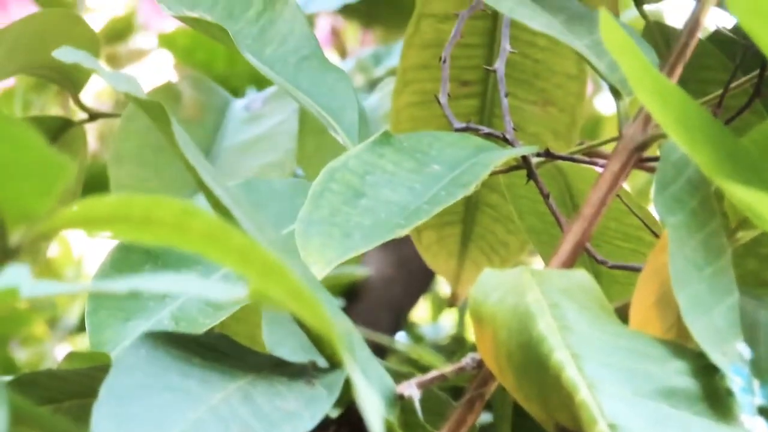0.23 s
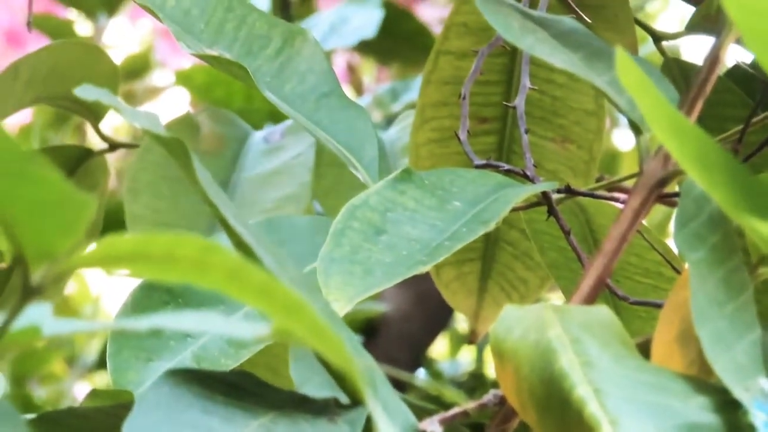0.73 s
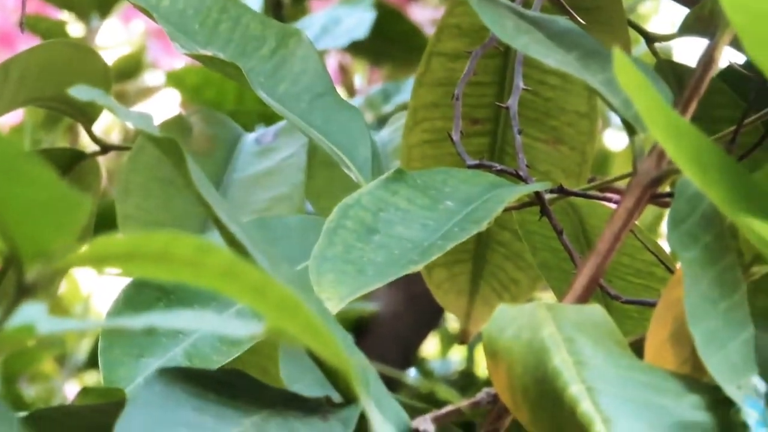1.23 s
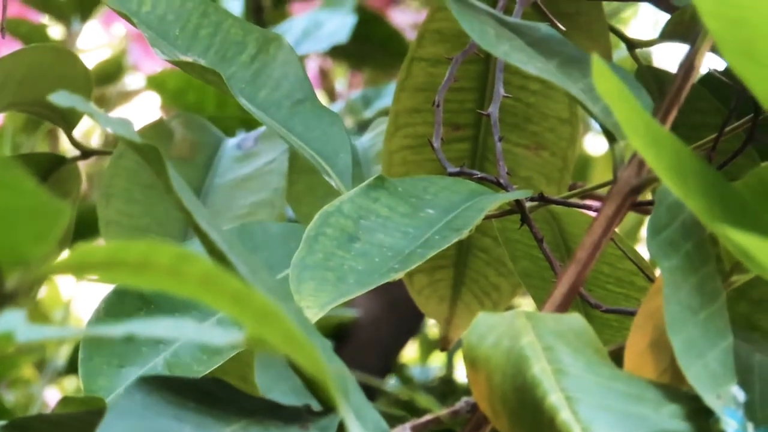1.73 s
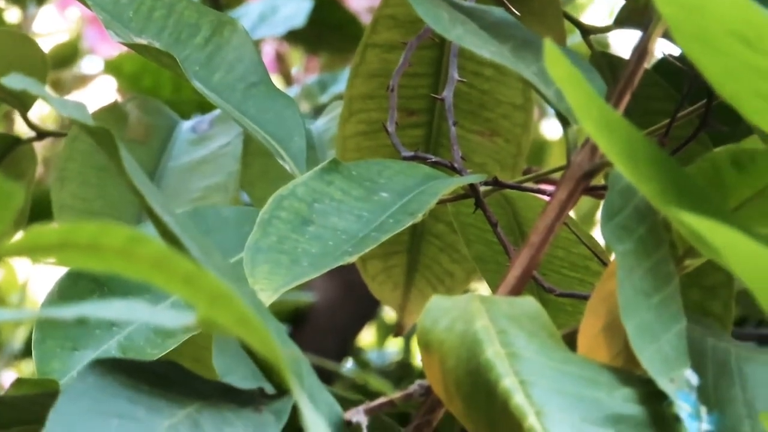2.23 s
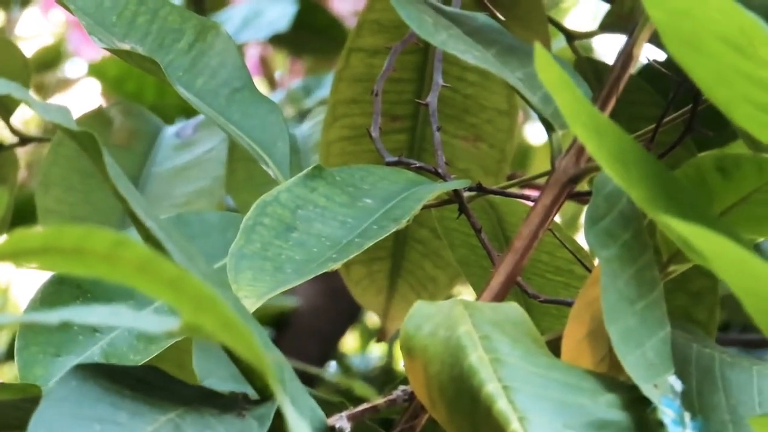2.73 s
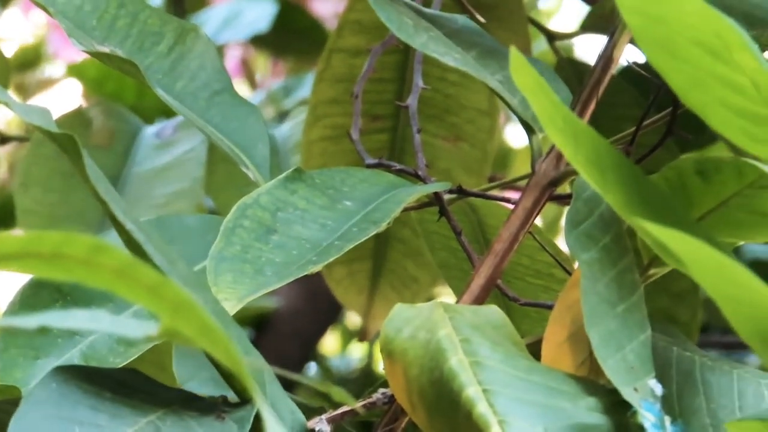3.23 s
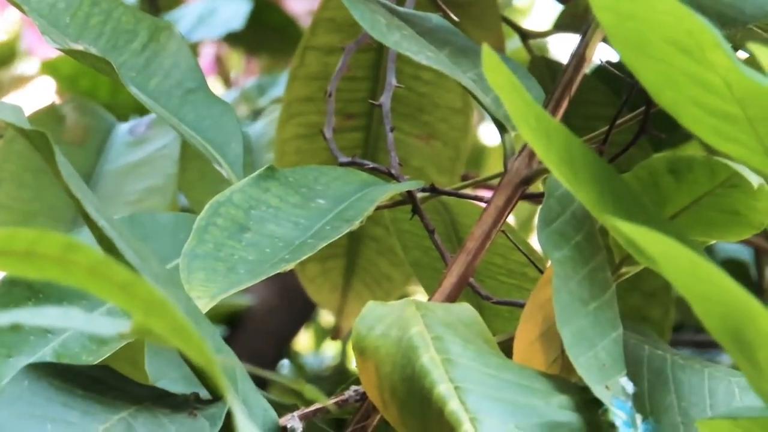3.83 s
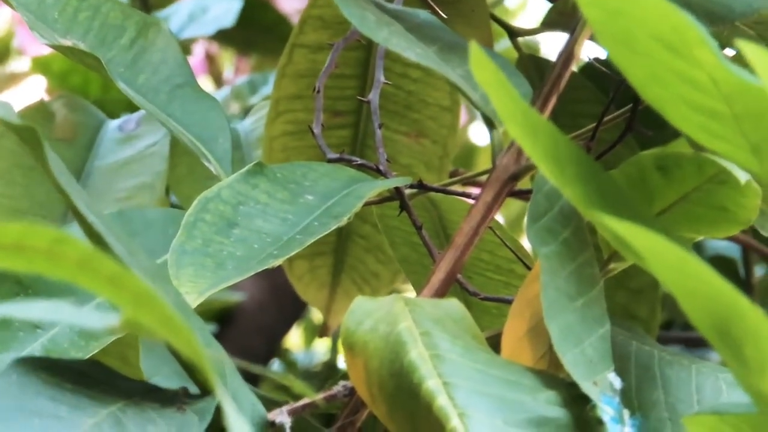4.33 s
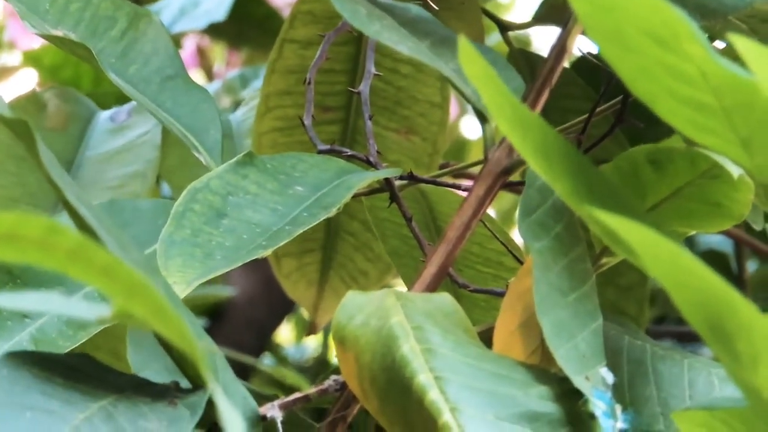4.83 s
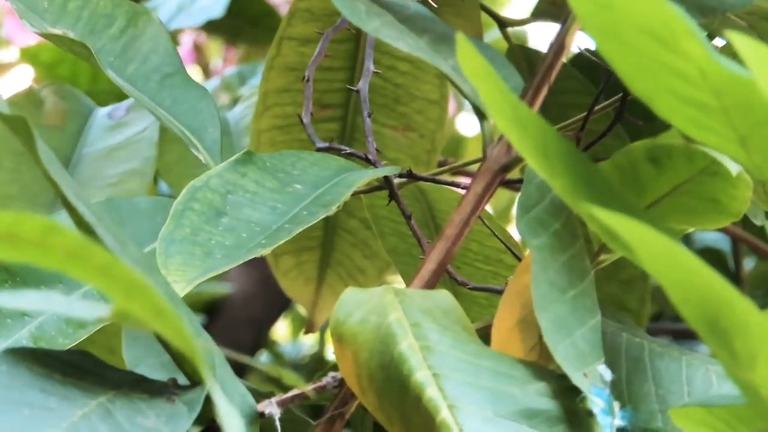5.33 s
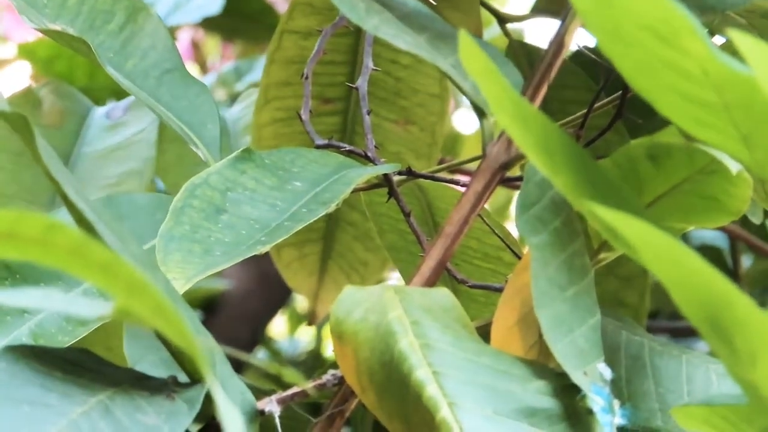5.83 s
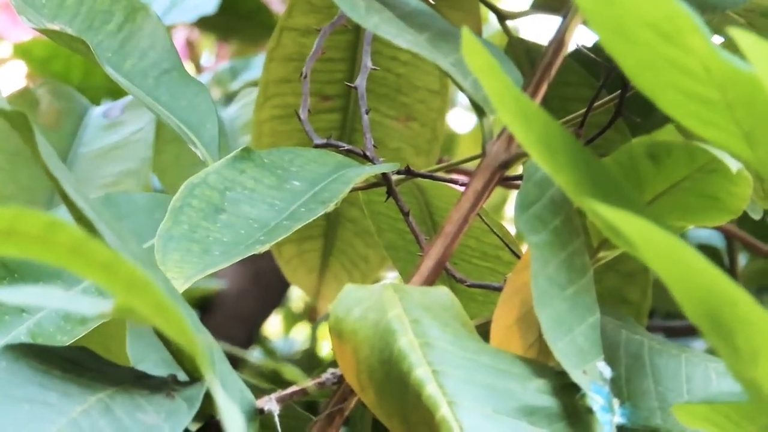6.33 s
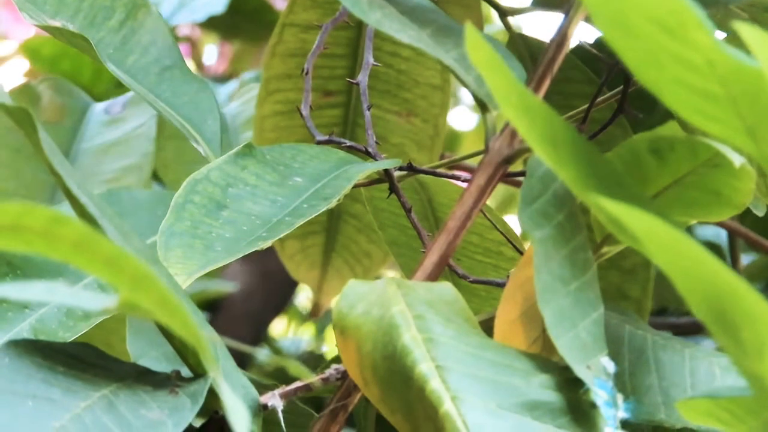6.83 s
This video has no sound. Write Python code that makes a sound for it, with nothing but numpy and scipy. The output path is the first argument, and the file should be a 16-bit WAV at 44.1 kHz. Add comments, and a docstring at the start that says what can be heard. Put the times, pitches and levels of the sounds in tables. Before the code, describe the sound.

A small bird sings a fast run of sharp chirps and buzzy rising trills in a shrub, over a faint town haze.

```python
"""In a garden shrub, tailorbirds peep and scold, then sing buzzy rising trills, a fast run of
two-part chirps and trills again. Each note is a gliding tone from the syrinx, a bird's voice box.
Leaves scatter every note, and walls and trees add a long faint tail. Behind them lie a town's haze,
a low motor drone, a thin insect hiss and far-off caws and hoots. Close by, a leaf brushes and
a hand bumps the microphone once."""
import sys
import numpy as np
from scipy import signal
from scipy.fft import rfft, irfft
from scipy.io import wavfile
from scipy.ndimage import uniform_filter1d

SR = 44100
rng = np.random.default_rng(int(sys.argv[2]) if len(sys.argv) > 2 else 0)


def write(x):
    x = np.atleast_2d(x).T
    wavfile.write(sys.argv[1], SR, np.round(np.clip(x, -1, 1) * 32767).astype(np.int16))


N = 312228
TIME = np.arange(N) / SR


def from_db(db):
    """Turn decibels into a gain."""
    return 10 ** (np.asarray(db) / 20)


def rms_one(x):
    """Scale a signal to an average strength (rms) of 1."""
    return x / np.sqrt(np.mean(x ** 2) + 1e-20)


def columns_at(rows, t):
    """Read every column of a curve at times t."""
    s, *columns = np.transpose(rows)
    return [np.interp(t, s, c) for c in columns]


def at_hz(points, hz):
    """Read a curve at frequencies hz, with octaves evenly spaced."""
    f, value = np.transpose(points)
    return np.interp(np.log(hz + 1), np.log(f), value)


def wander(rate_hz, size):
    """A random wobble of strength 1, up to about rate_hz fast."""
    hz = np.fft.rfftfreq(N, 1 / SR)[:size // 2 + 1] * N / size
    return rms_one(irfft(rfft(rng.standard_normal(size)) / (1 + (hz / rate_hz) ** 4), size))


def phase_of(hz):
    """The running angle of a tone that follows a pitch curve."""
    return 2 * np.pi * np.cumsum(hz) / SR


def narrow_noise(hz, width_hz):
    """One band of noise around a steady or moving pitch."""
    phase = phase_of(hz * np.ones(N))
    return wander(width_hz / 2, N) * np.cos(phase) + wander(width_hz / 2, N) * np.sin(phase)


def swells(rows):
    """Rounded humps of loudness from rows of t/s, length/s, level/dB."""
    out = np.zeros(N)
    for s, length, db in rows:
        progress = np.clip((TIME - s) / length, 0, 1)
        out += from_db(db) * np.sqrt(2 * np.abs(np.sin(np.pi * progress)))
    return out


# How wide the sound is between left and right: f/Hz, side level over middle/dB
STEREO_WIDTH = [(45, -47), (100, -49), (180, -30), (350, -18), (700, -25), (1400, -18), (2600, -14),
                (4400, -7.5), (8000, -2), (15000, 2.5)]
def stereo_noise(size):
    """White noise at two close microphones: alike in the bass, unrelated in the treble."""
    width = from_db(at_hz(STEREO_WIDTH, np.fft.rfftfreq(size, 1 / SR)))
    mid, side = rfft(rng.standard_normal((2, size)))
    return irfft((mid + width * side * [[1], [-1]]) / np.sqrt(1 + width ** 2), size)


def note_curves(t, low_hz, start_hz, top_hz, scoop_s, rise_s, bend, droop_hz_per_s,
                scoop_db, attack_s, hold_s, end_db, release_s):
    """A note scoops from low_hz to start_hz, climbs to top_hz, then droops if it lasts long enough."""
    scoop = np.clip(1 + t / scoop_s, 0, 1)
    rise = np.clip(t / rise_s, 0, 1)
    climb_hz = (top_hz - start_hz) * rise * (1 + bend * (1 - rise))   # bend > 0 arches the climb
    droop_hz = droop_hz_per_s * np.clip(t - rise_s, 0, hold_s)
    hz = low_hz + (start_hz - low_hz) * scoop ** 2 + climb_hz - droop_hz
    loudness = np.interp(t, [-scoop_s, 0, attack_s, hold_s, hold_s + release_s],
                         [0, from_db(scoop_db), 1, from_db(end_db), 0])
    return np.maximum(hz, low_hz), loudness


# The throat swallows the low overtones and lets the highest through: f/Hz, level/dB
THROAT = [(7000, 0.5), (8500, -4), (10500, -2), (13000, 2), (15000, 9)]
def syrinx(notes, shape, partials, jitter, jitter_hz, flutter_db, trill_hz=0, trill_depth=0, throb_db=0):
    """The voice box sings rows of t/s, level/dB, length factor, pitch factor; jitter shakes the pitch."""
    beak_hz, beak_width_hz, beak_peak_db = 4950, 240, 3.0   # the open beak favours one pitch
    out, size = np.zeros(N + SR), 8192
    for s, level_db, length, pitch in notes:
        first = max(round((s - shape["scoop_s"] * length) * SR), 0)
        t = (first + np.arange(size)) / SR - s
        hz, loudness = note_curves(t / length, **shape)
        # a trill swings the pitch after the scoop, then settles; the bottom of each swing is loudest
        swing = -np.cos(2 * np.pi * trill_hz * (t - .004) + .5 * wander(27, size))
        swing *= np.interp(t / length, [-.01, 0, .05, .0657], [0, .99, .99, .31])
        hz = hz * pitch * (1 + trill_depth * swing + .0044 * wander(58, size))
        shake = jitter * np.sqrt(loudness) * wander(jitter_hz, size)   # soft scoops are cleaner
        phase = phase_of(hz * (1 + shake))
        effort = loudness * from_db(flutter_db * wander(112, size) - throb_db * swing)
        for k, partial_db in partials:
            beak_db = beak_peak_db / (1 + ((k * hz - beak_hz) / beak_width_hz) ** 2)
            gain = from_db(level_db + partial_db + beak_db + at_hz(THROAT, k * hz))
            gain *= effort ** (1 + .026 * (k - 1))   # overtones grow faster with effort
            out[first:first + size] += np.sqrt(2) * gain * (k * hz < SR / 2) * np.sin(k * phase)
    return out[:N]


def with_air(voice, air_db, centre_hz=14300, width_hz=3600, flicker_db=4):
    """Air rushing through the syrinx adds an uneven high sizzle that follows the note."""
    loudness = np.sqrt(np.abs(uniform_filter1d(voice ** 2, size=128)))
    flicker = from_db(flicker_db * wander(70, N))
    return voice + from_db(air_db) * loudness * flicker * narrow_noise(centre_hz, width_hz)


def foliage(x, direct_db, leaves_db, leaves_s, tail_db, tail_s):
    """Swaying leaves scatter a sound quickly; walls and trees add a long dull tail."""
    t = TIME[:SR]
    leaf_shade = signal.butter(2, 10000, fs=SR, output="sos")
    dull = signal.butter(2, 7500, fs=SR, output="sos")
    out = from_db(direct_db) * signal.sosfilt(leaf_shade, x)
    sway = 2 * np.pi * .428 * TIME
    for share in (np.cos(sway), np.sin(sway)):   # the echoes drift between two patterns
        leaves = stereo_noise(SR) * from_db(-60 * t / leaves_s) * (t > .001)
        tail = stereo_noise(SR) * from_db(-60 * t / tail_s) * (1 - np.exp(-t / .0075))
        echoes = from_db(leaves_db) * rms_one(leaves)
        echoes += from_db(tail_db) * signal.sosfilt(dull, rms_one(tail))
        out = out + signal.fftconvolve((share * x)[None], echoes / np.sqrt(SR), axes=1)[:, :N]
    return out


# The haze's tone, before its three bands get their own levels: f/Hz, level/dB
HAZE_TONE = [(20, -34), (33, -9), (60, -3), (110, -9), (150, -11.5), (205, -11), (280, -18.5), (410, -17),
             (600, -19.5), (1200, -26.5), (2000, -31), (3200, -37.5), (6000, -49), (9000, -54.5),
             (15500, -64)]
# Its slow drift, before a small lift: t/s, rumble level/dB, middle level/dB
HAZE_DRIFT = [(0.0, -37, -37.5), (1.2, -37.5, -37.5), (6.31, -38, -39.5), (7.08, -37.5, -39)]
def town_haze():
    """Far traffic: the rumble and the middle drift in level while the high hiss slowly fades."""
    hz = np.fft.rfftfreq(N, 1 / SR)
    spectrum = rfft(stereo_noise(N)) * from_db(at_hz(HAZE_TONE, hz))
    low, high = hz < 250, hz > 1400
    rumble, mid, hiss = [rms_one(irfft(spectrum * band, N)) for band in (low, ~low & ~high, high)]
    rumble_db, mid_db = columns_at(HAZE_DRIFT, TIME)
    hiss_db = -46 - .3 * TIME
    return from_db(rumble_db + 1.98) * rumble + from_db(mid_db + .03) * mid + from_db(hiss_db) * hiss


# The motor's rise and fall, before a small cut: t/s, level/dB
MOTOR_LEVELS = [(0.1, -43), (0.69, -47), (0.73, -38), (3.67, -37), (4.88, -57), (5.42, -34), (5.85, -46),
                (6.23, -31), (7.0, -34.5)]
def motor():
    """A far motor throbs on one low, slightly unsteady note."""
    level_db, = columns_at(MOTOR_LEVELS, TIME)
    hz = 44 + 1.44 * wander(4.1, N)
    return from_db(level_db - 2.5) * np.sqrt(2) * np.sin(phase_of(hz))


# Note shapes of the steep lead-in and of the scratchy strand above it
LEAD_SHAPE = dict(low_hz=3336, start_hz=4300, top_hz=6465, scoop_s=.038, rise_s=.046, bend=0.226, droop_hz_per_s=3000, scoop_db=-11.5, attack_s=0.018, hold_s=.037, end_db=-3.5, release_s=0.015)
STRAND_SHAPE = dict(low_hz=4450, start_hz=5050, top_hz=7700, scoop_s=.018, rise_s=.05, bend=0.124, droop_hz_per_s=3000, scoop_db=0.5, attack_s=0.0061, hold_s=0.058, end_db=-14.5, release_s=0.012)
# The tones in a rough note: multiple of the pitch, level/dB
ROUGH_PARTIALS = [(1, -0.5), (2, -33), (3, -41)]
# Faint lead-ins on their own before the song: t/s, level/dB
PEEPS = [(.11, -54.5), (.207, -56), (0.282, -50)]
def lead_ins():
    """Steep notes, alone and then before each chirp and trill; the syrinx's second side adds a strand."""
    notes = [(s, db, 1, 1.04) for s, db in PEEPS]
    for s, _, _, ahead_s in CHIRPS:
        run_s = s - CHIRPS[0][0]
        notes.append((s - ahead_s, -27.5 - run_s, 1, 1.05 - .033 * run_s))   # tiring: softer and lower
    notes += before_trills(ahead_s=.037, softer_db=-8, pitch_factor=.94)
    strand_notes = [(s - .026, db - 10.5, length, pitch) for s, db, length, pitch in notes]
    sweeps = syrinx(notes, LEAD_SHAPE, ROUGH_PARTIALS, jitter=.023, jitter_hz=450, flutter_db=4.5)
    strands = syrinx(strand_notes, STRAND_SHAPE, ROUGH_PARTIALS,
                     jitter=.0565, jitter_hz=550, flutter_db=4)
    return sweeps + strands


# Bursts of hiss: t/s, length/s, level/dB, first f/Hz, last f/Hz, settling time/s
INSECT_BURSTS = [(.265, 0.41, -63, 9900, 9170, .08), (3.2, .98, -62, 10800, 9740, 0.52)]
def insect():
    """An insect's thin hiss starts high and settles lower in each burst."""
    hz = np.full(N, float(INSECT_BURSTS[0][3]))
    for s, _, _, first_hz, last_hz, settle_s in INSECT_BURSTS:
        glide_hz = last_hz + (first_hz - last_hz) * np.exp(-np.abs(TIME - s) / settle_s)
        hz = np.where(TIME < s, hz, glide_hz)
    hiss = np.array([narrow_noise(hz, 1100) + from_db(-1) * narrow_noise(hz, 4200) for ear in range(2)])
    return swells([row[:3] for row in INSECT_BURSTS]) * hiss


# Note shape of a harsh scold
RASP_SHAPE = dict(low_hz=2080, start_hz=2130, top_hz=2210, scoop_s=.008, rise_s=.036, bend=-.3, droop_hz_per_s=500, scoop_db=-8, attack_s=.008, hold_s=.037, end_db=-1.5, release_s=.012)
# The tones in a harsh rasp and in a soft one: multiple of the pitch, level/dB
RASP_PARTIALS = [(1, -2), (2, 7), (3, -13), (4, -12)]
SOFT_RASP_PARTIALS = [(1, -1), (2, 12), (3, 6)]
# Scolding notes: t/s, level/dB
RASPS = [(.39, -56.5), (.725, -60.5), (1.16, -62), (1.404, -58), (1.884, -47), (2.124, -48), (2.25, -52.5),
         (2.36, -47), (2.634, -57), (2.769, -50.5), (2.899, -56), (3.064, -55), (3.494, -54.5)]
def rasps():
    """A fast-shaking pitch and rushing air make harsh scolds; a faint rasp also opens each trill."""
    scolds = [(s, db, 1, 1) for s, db in RASPS]
    harsh = syrinx(scolds, RASP_SHAPE, RASP_PARTIALS, jitter=.056, jitter_hz=620, flutter_db=7)
    harsh = with_air(harsh, air_db=-3, centre_hz=6000, width_hz=3000, flicker_db=2.5)
    openers = before_trills(ahead_s=.065, softer_db=-27.5, pitch_factor=1)
    soft = syrinx(openers, RASP_SHAPE, SOFT_RASP_PARTIALS, jitter=.076, jitter_hz=610, flutter_db=-2)
    return harsh + soft


# The two tones in a pip: multiple of the pitch, level/dB
PIP_PARTIALS = [(1, -0.89), (2, 0)]
# Pips: t/s, level/dB
PIPS = [(.392, -46.5), (.718, -45), (1.16, -55), (1.404, -48)]
def pips():
    """Clean pips, two tones an octave apart, ring through the first scolds."""
    notes = [(s, db, 1, 1) for s, db in PIPS]
    return syrinx(notes, RASP_SHAPE, PIP_PARTIALS, jitter=.0079, jitter_hz=300, flutter_db=5)


def leaf_rustle():
    """A leaf brushes softly close by."""
    return swells([(.62, .13, -39)]) * narrow_noise(750, 1300)


# Note shape of a rising trill
TRILL_SHAPE = dict(low_hz=3300, start_hz=5200, top_hz=6550, scoop_s=.028, rise_s=.039, bend=-0.452, droop_hz_per_s=6800, scoop_db=-9, attack_s=0.0062, hold_s=0.065, end_db=0, release_s=0.015)
# Trills: t/s, level/dB, length factor, pitch factor
TRILLS = [(.8, -30, 1.31, 0.98), (1.026, -26.5, 1.41, 1.006), (1.264, -25, 1.09, .99),
          (5.322, -25.5, 1.19, .98), (5.626, -25.5, 0.83, 1.03), (6.461, -24, 0.96, 0.99),
          (6.705, -24.5, 1.05, 1.01), (6.932, -24.5, 1.27, 1)]
def trills():
    """The pitch swings so fast that each rising note buzzes."""
    voice = syrinx(TRILLS, TRILL_SHAPE, ROUGH_PARTIALS, jitter=.023, jitter_hz=354, flutter_db=2,
                   trill_hz=62.2, trill_depth=.1112, throb_db=5.5)
    return with_air(voice, air_db=-34.5, centre_hz=13400, width_hz=3300)


def before_trills(ahead_s, softer_db, pitch_factor):
    """List one opening note ahead of every trill."""
    return [(s - ahead_s, db + softer_db, 1, pitch * pitch_factor) for s, db, _, pitch in TRILLS]


# Where the cawing throat rings: f/Hz, width/Hz, level/dB
CAW_THROAT = [(239.4, 58, 2), (433.5, 150, 1), (893, 630, 3.5), (1496, 175, 2), (1780, 190, 2.5),
              (2028, 280, 2.5), (2603, 1700, -1)]
# Caws: t/s, length/s, level/dB
CAWS = [(1.41, 0.22, -37), (1.6, 0.25, -37.5), (5.27, 0.43, -48), (5.98, 0.48, -49), (6.6, 0.32, -48)]
def caws():
    """Hoarse calls, blurred by distance into swells of throat-shaped noise."""
    throat = sum(from_db(db) * narrow_noise(hz, width) for hz, width, db in CAW_THROAT)
    return swells(CAWS) * rms_one(throat)


# Note shape of the clear arched whistle
WHISTLE_SHAPE = dict(low_hz=3017, start_hz=4062, top_hz=5433, scoop_s=.021, rise_s=0.083, bend=0.447, droop_hz_per_s=22000, scoop_db=-11.5, attack_s=.011, hold_s=.078, end_db=0, release_s=0.005)
# The tones in a whistle: multiple of the pitch, level/dB
WHISTLE_PARTIALS = [(1, -1), (2, -32.5), (3, -34.5)]
# The fast run of chirps: t/s, level/dB, length factor, head start of the lead-in/s
CHIRPS = [(1.494, -24.5, 0.99, 0.061), (1.724, -24.5, 0.91, 0.063), (1.961, -24.5, 0.96, 0.047),
          (2.197, -23.5, 0.94, 0.066), (2.435, -22.5, 0.98, 0.062), (2.671, -24, 1.0, .058),
          (2.908, -25, 0.98, 0.05), (3.148, -21.5, .93, 0.057), (3.382, -23, 0.98, .053),
          (3.618, -24.5, 0.83, .051), (3.860, -24.5, 1, 0.065), (4.103, -25, 0.99, 0.062),
          (4.391, -24.5, 0.9, 0.059), (4.659, -23.5, 0.93, 0.06)]
def chirp_whistles():
    """An almost pure, arching whistle is the second part of each chirp."""
    notes = [(s, db, length, 1) for s, db, length, _ in CHIRPS]
    return syrinx(notes, WHISTLE_SHAPE, WHISTLE_PARTIALS, jitter=.0095, jitter_hz=260, flutter_db=2)


# Note shape of a nearly straight upward slide
SLIDE_SHAPE = dict(low_hz=3550, start_hz=3950, top_hz=5250, scoop_s=.012, rise_s=.06, bend=.2, droop_hz_per_s=8000, scoop_db=-8, attack_s=.007, hold_s=.055, end_db=-1.5, release_s=.013)
# Slides: t/s, level/dB, pitch factor
SLIDES = [(1.833, -32.5, 1.04), (2.073, -32, 1.05), (2.325, -29.5, 1.04), (2.581, -28, 1.0),
          (2.845, -30.5, 0.96), (2.994, -31.5, 0.96), (3.3, -29.5, .95), (3.442, -31.5, 0.92),
          (3.545, -42, 1.06)]
def second_bird():
    """A second bird slips rising whistles between the chirps."""
    notes = [(s, db, 1, pitch) for s, db, pitch in SLIDES]
    return syrinx(notes, SLIDE_SHAPE, WHISTLE_PARTIALS, jitter=.016, jitter_hz=300, flutter_db=3.5)


# Hoots: t/s, length/s, level/dB
HOOTS = [(2.62, 0.4, -48), (4.02, 0.28, -51), (5.33, 0.39, -48), (6.82, 0.32, -48.5)]
def hoots():
    """Soft hoots, blurred by distance into two narrow bands of noise."""
    voice = from_db(2.5) * narrow_noise(770, 110) + from_db(-6) * narrow_noise(400, 52)
    return swells(HOOTS) * voice


def hand_bump():
    """A hand bumps the microphone with one low thud."""
    return swells([(3.47, .083, -29)]) * np.sin(phase_of(np.full(N, 99.0)))


def scene():
    """Birds in the shrub over the neighbourhood; scratchy notes arrive more scattered than whistles."""
    clear = with_air(chirp_whistles() + second_bird(), air_db=-46)
    scratchy = with_air(lead_ins() + rasps() + pips(), air_db=-25)
    birds = (foliage(clear, direct_db=-2.5, leaves_db=-1, leaves_s=.22, tail_db=-13.5, tail_s=.81)
             + foliage(scratchy, direct_db=-3.5, leaves_db=-1, leaves_s=.23, tail_db=-9.5, tail_s=.99)
             + foliage(trills(), direct_db=-8.5, leaves_db=-3, leaves_s=.12, tail_db=-14.5, tail_s=.71))
    return birds + town_haze() + motor() + insect() + leaf_rustle() + caws() + hoots() + hand_bump()


def record(dry):
    """The very highest treble is cut off steeply."""
    cutoff_hz = 15800
    return signal.sosfilt(signal.ellip(10, .1, 80, cutoff_hz, fs=SR, output="sos"), dry)


dry = scene()
out = record(dry)
write(out)
```